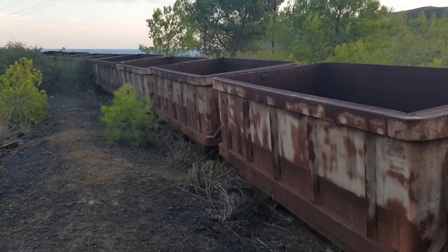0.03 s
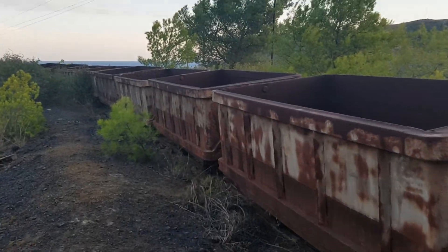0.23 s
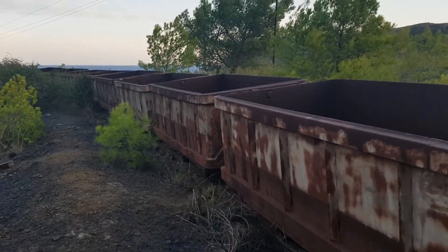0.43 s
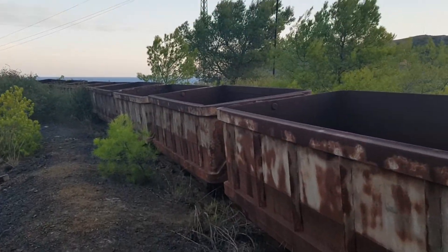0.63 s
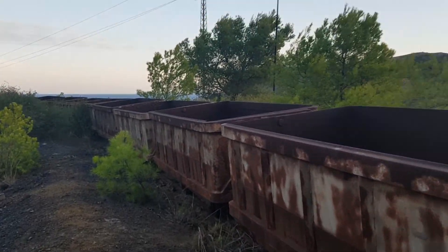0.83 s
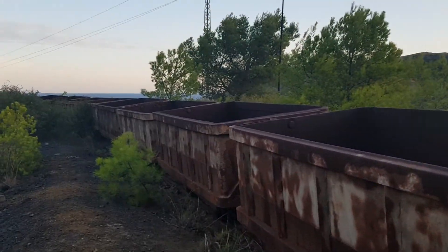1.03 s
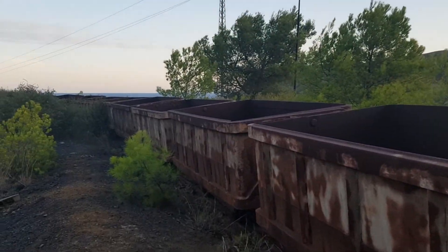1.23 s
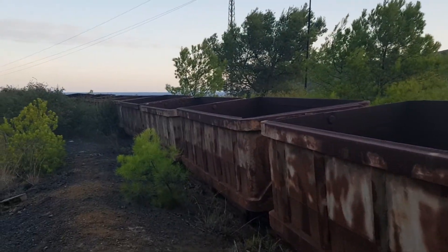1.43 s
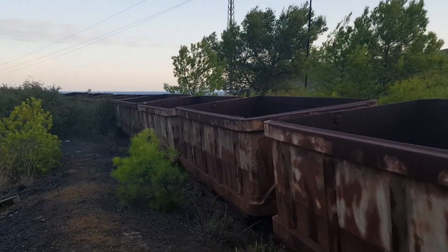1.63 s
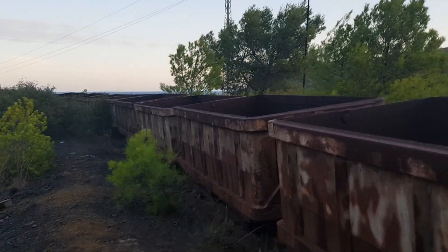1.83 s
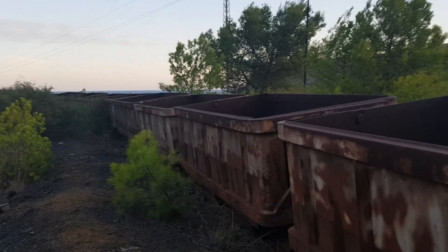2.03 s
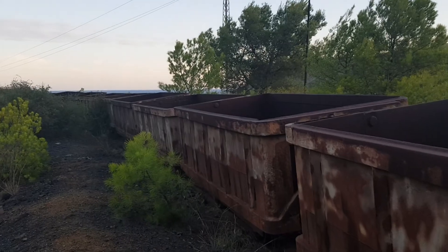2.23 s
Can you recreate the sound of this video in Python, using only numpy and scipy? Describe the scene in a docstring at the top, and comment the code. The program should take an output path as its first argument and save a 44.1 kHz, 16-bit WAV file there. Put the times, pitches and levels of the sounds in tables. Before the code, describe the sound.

Gravel footsteps: one loud grinding, cracking step, then lighter crunches amid rumbling wind gusts

```python
"""Footsteps on coarse gravel outdoors, heard through two microphone ports: noise, ringing sines and swells.
Wind, open-air hiss and a faint hum open; a step then grinds, cracks and pings (grains, rings, metal sine).
The strongest gusts buffet each port (low noise, short swings) around a second scuff near 0.8 s.
Lighter steps follow with soft thumps, a second hum near 1.15 s and one stone squeak near 1.57 s;
filtered-noise wind and hiss run to the end."""
import sys
import numpy as np
from scipy import signal
from scipy.fft import rfft, irfft
from scipy.io import wavfile
from scipy.ndimage import uniform_filter1d

SR = 44100
rng = np.random.default_rng(int(sys.argv[2]) if len(sys.argv) > 2 else 0)


def unload_audio(sound):
    """Save the sound as a 16-bit wav file, at the path given as the first command line argument."""
    columns = np.transpose(np.atleast_2d(sound))
    # keep every value between -1 and 1, then stretch to whole-number steps
    steps = np.round(np.clip(columns, -1, 1) * 32767)
    wavfile.write(sys.argv[1], SR, steps.astype(np.int16))


N = 101429  # length in samples


def amp(db):
    """Turns decibels into a linear gain."""
    return 10 ** (np.asarray(db, float) / 20)


def even(x):
    """Scales each channel to an RMS of 1."""
    return x / np.sqrt(np.mean(x ** 2, axis=-1, keepdims=True) + 1e-20)


def shape(x, points, sign=1):
    """Filters by a (freq_hz, gain_db) curve, straight in log frequency; sign scales its dB."""
    hz = np.fft.rfftfreq(x.shape[-1], 1 / SR)
    curve_hz, curve_db = np.transpose(points)
    gain_db = np.interp(np.log(hz + 1), np.log(curve_hz + 1), curve_db)
    return irfft(rfft(x) * amp(sign * gain_db), x.shape[-1])


def column(table, index):
    """Draws one table column as a line over time, with time in the first column."""
    return np.interp(np.arange(N) / SR, [row[0] for row in table], [row[index] for row in table])


def add(mix, start_s, sound, pan_db):
    """Mixes a sound in at a time, with a left-right level difference."""
    part = mix[:, max(round(start_s * SR), 0):][:, :sound.shape[-1]]
    part += amp([[pan_db / 2], [-pan_db / 2]]) * sound[..., :part.shape[1]]


# sole grinding and scuffing: start_s, length_s, body_db, grit_db, fizz_db
SCRAPE_STROKES = [(0.183, 0.088, -50, -67, -64), (0.211, 0.13, -43, -88, -63),
                  (0.278, 0.09, -50.5, -54, -55), (0.365, 0.072, -55, -66.5, -66),
                  (0.425, 0.096, -56.5, -64.5, -61), (0.555, 0.42, -64, -70, -73.5),
                  (0.735, 0.056, -54, -41, -43), (0.754, 0.052, -45.5, -43.5, -74),
                  (0.815, 0.026, -62, -56.5, -78), (1.022, 0.048, -110, -71, -69),
                  (1.194, 0.14, -70, -64, -63.5), (1.306, 0.024, -43, -48.5, -87),
                  (1.364, 0.027, -46, -59.5, -59.5), (1.413, 0.036, -50, -59, -86),
                  (1.57, 0.079, -61, -62.5, -98), (1.698, 0.06, -61, -62, -90),
                  (1.787, 0.031, -49, -63, -77), (1.833, 0.081, -54, -62, -80),
                  (1.922, 0.045, -50, -66, -96), (2.174, 0.039, -82, -84, -67)]
# stone noise colours, low to high: freq_hz, gain_db
BODY_COLOUR = [(200, -12), (500, -3), (1200, 0), (2200, -3), (3200, -7), (4500, -18), (16000, -50)]
GRIT_COLOUR = [(500, -87), (2000, -11), (3500, -4.5), (5500, -2), (7200, -16), (9000, -32), (16000, -36)]
FIZZ_COLOUR = [(200, -56), (6000, -12), (8200, -8), (10000, 0.5), (14300, 0), (15000, 1), (16000, -23)]
GRAINS_PER_S, SPREAD_DB, GRAIN_PAN_DB = 6000, 3.6, 3.0
SMOOTH_SHARE = .3  # share of plain hiss against grains
ATTACK_S, RELEASE_S = .006, .014
CLUMP_DB, SAG_DB = 2.0, -2  # RMS of the clumping; level change over one stroke length
RING_S, RISE_S = .00025, .0003  # extra ring time of every grain; onset of grains and cracks


def grind():
    """Random grains, each ringing one of 24 stones at its own place, clump into body, grit and fizz strokes."""
    t, ring_t = np.arange(N) / SR, np.arange(200) / SR
    hits = rng.random(N) < GRAINS_PER_S / SR
    size = hits * amp(SPREAD_DB * np.minimum(rng.exponential(1, N), 4))
    stone, grains = rng.integers(0, 24, N), np.zeros((2, N))
    for k, hz in enumerate(np.geomspace(400, 16000, 24)):
        decay = np.exp(-ring_t / (1.5 / hz + RING_S))
        ring = np.sin(2 * np.pi * hz * ring_t) * decay * np.minimum(ring_t / RISE_S, 1) * np.sqrt(hz)
        one_stone = signal.oaconvolve(size * (stone == k), ring)[:N]
        add(grains, 0, one_stone, GRAIN_PAN_DB * rng.standard_normal())

    slow_noise = uniform_filter1d(uniform_filter1d(rng.standard_normal(N), size=200), size=200)
    clumps = amp(CLUMP_DB * even(slow_noise))
    level, hiss = np.zeros((3, N)), rng.standard_normal((3, N))
    for start_s, length_s, *band_db in SCRAPE_STROKES:
        part = slice(round(start_s * SR), round((start_s + length_s + 8 * RELEASE_S) * SR))
        age = t[part] - start_s
        release = np.exp(-np.maximum(age - length_s, 0) / RELEASE_S)
        stroke = np.clip(age / ATTACK_S, 0, 1) * amp(SAG_DB * age / length_s) * release
        level[:, part] += amp(band_db)[:, None] * stroke

    out = np.zeros((2, N))
    for k, colour in enumerate([BODY_COLOUR, GRIT_COLOUR, FIZZ_COLOUR]):
        rough = even(shape(grains, colour))
        smooth = even(shape(hiss[0] + hiss[1:], colour))  # partly shared by the ports
        out += level[k] * ((1 - SMOOTH_SHARE) * rough + SMOOTH_SHARE * smooth)
    return clumps * out


# single stones cracking: start_s, level_db, low_ring_hz, upper_ring_hz, upper_ring_db (relative to level_db)
STONE_CRACKS = [(0.17, -41.5, 1190, 2630, -21), (0.224, -39, 1900, 4500, -21),
                (0.2362, -17.5, 1640, 3230, -26), (0.238, -26, 1750, 990, -10),
                (0.2458, -10.5, 1260, 4220, -9), (0.259, -22.5, 530, 4200, -0.5),
                (0.2622, -14.5, 1110, 2200, -10), (0.292, -30, 633, 1900, -7),
                (0.3261, -14, 1240, 2520, -6), (0.336, -25.5, 1080, 2090, 4.5),
                (0.387, -25.5, 740, 1530, -4), (0.438, -32, 794, 2440, -3), (0.504, -37.5, 560, 1530, -4),
                (0.737, -39.5, 538, 4750, 13), (0.755, -33, 575, 4020, 5), (0.784, -17, 2370, 5400, -7),
                (0.7955, -26.5, 3400, 3600, 4.5), (0.7976, -25.5, 2030, 5030, 9),
                (0.804, -36, 2000, 5900, 18), (0.850, -49, 538, 4360, 4), (0.905, -35, 550, 4770, -2),
                (1.0039, -36, 584, 3880, 0), (1.052, -62, 711, 5490, 12), (1.087, -46, 455, 5540, 5.5),
                (1.158, -43, 545, 5430, 7), (1.276, -34, 479, 5500, 2.5), (1.303, -40, 660, 2920, -12),
                (1.3205, -35.5, 700, 3180, 9), (1.3593, -34, 660, 4650, 2.5),
                (1.379, -32.5, 400, 5570, 0.5), (1.425, -30, 1420, 4690, -2.5), (1.444, -45, 624, 5100, 6),
                (1.609, -31, 2070, 3020, -9.5), (1.704, -56.5, 483, 4830, 19), (1.786, -39, 751, 2600, 3),
                (1.796, -28, 650, 2900, -18), (1.869, -38, 1240, 3300, 8), (1.891, -34.5, 1370, 2700, -7),
                (1.897, -33, 1240, 3460, -12), (1.928, -29.5, 1740, 3380, -14), (1.945, -43, 900, 2480, 2),
                (1.956, -40, 895, 2200, -2), (2.156, -42.5, 510, 5070, -18), (2.208, -38, 676, 2530, -25)]
RING_CYCLES, UPPER_CYCLES = 1.0, 3.2  # cycles until a ring falls to 1/e
TICK_DB, SNAP_DB, RATTLE_DB = -8.5, -22.5, -18.5  # tick and snap also follow upper_ring_db
TICK_T60, SNAP_T60, RATTLE_T60 = 0.0049, 0.02, 0.044  # seconds to fall 60 dB


def cracks():
    """Each crack: a low and an upper ring of the stone, a tick, a treble snap and a rattle of neighbours."""
    out, t = np.zeros((2, N)), np.arange(1536) / SR
    noise = rng.standard_normal((len(STONE_CRACKS), 3, 2, len(t)))
    for row, (tick_noise, snap_noise, rattle_noise) in zip(STONE_CRACKS, noise):
        start_s, level_db, low_hz, upper_hz, upper_db = row
        low_ring = np.sin(2 * np.pi * low_hz * t) * np.exp(-t * low_hz / RING_CYCLES)
        upper_ring = amp(upper_db) * np.sin(2 * np.pi * upper_hz * t) * np.exp(-t * upper_hz / UPPER_CYCLES)
        tick_colour = even(shape(tick_noise[0] + .5 * tick_noise, GRIT_COLOUR))
        tick = amp(upper_db + TICK_DB - 60 * t / TICK_T60) * tick_colour
        snap = amp(upper_db + SNAP_DB - 60 * t / SNAP_T60) * even(shape(snap_noise, FIZZ_COLOUR))
        neighbours = shape(rattle_noise, BODY_COLOUR) + amp(upper_db) * shape(rattle_noise, GRIT_COLOUR)
        rattle = amp(RATTLE_DB - 60 * t / RATTLE_T60) * even(neighbours)
        crack = low_ring + upper_ring + tick + snap + rattle
        add(out, start_s, amp(level_db) * np.minimum(t / RISE_S, 1) * crack, 0)
    return out


# sole landing: start_s, level_db, pitch_hz
SOLE_THUDS = [(0.258, -29, 312), (0.91, -28, 370), (1.312, -32, 362), (1.79, -40, 565)]
THUD_RISE_S, THUD_T60 = 0.0016, 0.048  # onset; seconds to fall 60 dB


def thuds():
    """A short hollow thump of the packed ground: a quickly decaying sine."""
    out, t = np.zeros((2, N)), np.arange(3000) / SR
    for start_s, level_db, hz in SOLE_THUDS:
        envelope = amp(level_db - 60 * t / THUD_T60) * np.minimum(t / THUD_RISE_S, 1)
        add(out, start_s, envelope * np.sin(2 * np.pi * hz * t), 0)
    return out


CHIRP_S, CHIRP_LENGTH_S, CHIRP_HZ, CHIRP_DB = 1.568, 0.016, 5150, -47.5
CHIRP_OCTAVE_DB, CHIRP_SLIPS_HZ = -3, 200  # octave relative to the tone; slips (swells) per second


def chirp():
    """A small stone squeaks in quick slips: a wavering tone and its octave, pulsed."""
    out, t = np.zeros((2, N)), np.arange(0, CHIRP_LENGTH_S, 1 / SR)
    waver = np.cumsum(0.087 * rng.standard_normal(len(t)))  # random walk of phase, radians
    phase = 2 * np.pi * CHIRP_HZ * t + waver
    tone = np.sin(phase) + amp(CHIRP_OCTAVE_DB) * np.sin(2 * phase)
    slips = np.sin(np.pi * CHIRP_SLIPS_HZ * t) ** 2
    add(out, CHIRP_S, amp(CHIRP_DB) * slips * tone, 0)
    return out


# port colour: freq_hz, left_minus_right_db
PORT_COLOUR = [(180, -1.5), (550, 7), (1650, -2.5), (4970, -2.5), (15000, 2.5)]
LEFT_LAG_S = .00004
SCATTER_T60, SCATTER_LEVEL_DB = .008, -12  # seconds to fall 60 dB; total relative to the direct sound


def ground(x):
    """Port colour and delay, plus scattering off the stones as decaying noise that differs per port."""
    t = np.arange(800) / SR
    taps = rng.standard_normal((2, len(t))) * amp(-60 * t / SCATTER_T60)
    taps *= amp(SCATTER_LEVEL_DB) / np.linalg.norm(taps, axis=1, keepdims=True)
    # direct sound at tap 6, the left a fraction later; the 6 samples are cut off again below
    taps[0, :16] += np.sinc(np.arange(16) - 6 - LEFT_LAG_S * SR)
    taps[1, 6] += 1
    left, right = signal.oaconvolve(x, taps, axes=1)[:, 6:N + 6]
    return np.array([shape(left, PORT_COLOUR, sign=.5), shape(right, PORT_COLOUR, sign=-.5)])


# small metal part: start_s, level_db
METAL_PINGS = [(0.238, -45), (0.311, -49.5), (0.3627, -51.5)]
PING_HZ, PING_T60 = 10400, .035  # pitch; seconds to fall 60 dB


def pings():
    """A small metal part rings as a decaying high sine."""
    out, t = np.zeros((2, N)), np.arange(3000) / SR
    for start_s, level_db in METAL_PINGS:
        add(out, start_s, amp(level_db - 60 * t / PING_T60) * np.sin(2 * np.pi * PING_HZ * t), 0)
    return out


# faint short hums: start_s, length_s, pitch_hz, level_db
FAINT_HUMS = [(0.035, 0.093, 401, -57), (1.142, 0.19, 296.7, -56.5)]


def hums():
    """Each hum is a steady sine that swells and fades."""
    out = np.zeros((2, N))
    for start_s, length_s, hz, level_db in FAINT_HUMS:
        t = np.arange(0, length_s, 1 / SR)
        swell = np.sin(np.pi * t / length_s) ** .5
        add(out, start_s, amp(level_db) * swell * np.sin(2 * np.pi * hz * t), 0)
    return out


# wind strength on the ports: time_s, left_db, right_db
WIND_LEVELS = [(0.0, -53, -48), (0.1, -39.5, -54), (0.33, -35, -32.5), (0.39, -36, -47.5), (0.42, -42, -46),
               (0.48, -35.5, -43), (0.51, -49, -52), (0.54, -37.5, -35), (0.59, -29, -42),
               (0.65, -23.5, -32), (0.7, -18.5, -18), (0.79, -49, -23.5), (0.83, -29.5, -29.5),
               (0.89, -40.5, -28.5), (0.94, -19.5, -24), (0.98, -75, -57.5), (1.08, -72, -50),
               (1.2, -39, -49), (1.42, -74, -57), (1.51, -45, -39), (1.58, -48.5, -93), (1.62, -42, -47),
               (1.71, -51, -51), (1.78, -46, -43), (1.83, -30.5, -33.5), (1.88, -57, -37),
               (2.01, -29.5, -33.5), (2.04, -36.5, -45.5), (2.07, -34, -28), (2.1, -35, -42),
               (2.13, -36.5, -34), (2.22, -36, -35), (2.29, -36.5, -42)]
# turbulence colour: freq_hz, gain_db
GUST_COLOUR = [(12, -72), (30, -15), (55, 4), (100, -0.5), (150, -8), (210, -13.5), (315, -18.5),
               (430, -33), (770, -46), (1100, -88)]
# sharp pressure buffets: centre_s, level_db, swing_hz, left_minus_right_db
PRESSURE_BUFFETS = [(0.108, -30.5, 115, 17), (0.546, -24, 112.7, -8), (0.604, -23, 104, 17.5),
                    (0.648, -24.5, 97, 22), (0.664, -18, 127.6, -16.5), (0.709, -18.5, 120, 17),
                    (0.717, -19.5, 152, -13), (0.744, -25.5, 160, 26), (0.786, -18.5, 112, 5),
                    (0.802, -23.5, 138, 18), (0.933, -32.5, 88, -4), (1.2, -30.5, 89, -1),
                    (1.817, -41, 111, 1), (2.006, -27.5, 110.5, 1), (2.219, -33, 113, 5)]
BUFFET_CYCLES = 0.84  # width of the bell envelope, in swings
LUMP_DB, LUMP_HZ = 3.5, 24.4  # RMS of the level lumps; rate above which they fall away
WIND_SAME = -0.28  # left turbulence mixed into the right, inverted
BRIGHTEN, CALM_DB = 0.098, -32.5  # upper-part dB per dB of wind above CALM_DB


def wind():
    """Lumpy low turbulence, nearly unrelated per port and brighter when strong, with single pressure buffets."""
    turbulence, lumps = rng.standard_normal((2, 2, N))
    turbulence[1] += WIND_SAME * turbulence[0]
    lumps = even(shape(lumps, [(1, 0), (LUMP_HZ, 0), (3 * LUMP_HZ, -40), (20000, -90)]))
    level_db = np.array([column(WIND_LEVELS, index=1), column(WIND_LEVELS, index=2)])
    flow = even(shape(turbulence, GUST_COLOUR + [(2000, -97.0)]))
    low = shape(flow, [(140, 10), (220, -46), (400, -89.5)])
    brightness = amp(BRIGHTEN * (level_db - CALM_DB))
    out = amp(level_db + LUMP_DB * lumps) * (low + brightness * (flow - low))
    for centre_s, buffet_db, hz, pan_db in PRESSURE_BUFFETS:
        cycles = np.arange(-2, 2, hz / SR)
        bell = np.exp(-(cycles / BUFFET_CYCLES) ** 2 * 2)
        add(out, centre_s - 2 / hz, amp(buffet_db) * bell * np.sin(2 * np.pi * cycles), pan_db)
    return out


# open-air hiss colour: freq_hz, gain_db
AIR_COLOUR = [(150, -13), (250, -5.5), (407, -3), (1100, -19.5), (1980, -18), (3460, -22.5), (4900, -20.5),
              (6590, -26), (8260, -38.5), (11700, -23.5), (16000, -30.5)]
AIR_DB, AIR_SAME = -62, 0.46  # RMS level; weight of the noise common to both ports


def air():
    """Quiet open-air hiss: steady coloured noise, partly common to both ports."""
    noise = rng.standard_normal((3, N))
    ports = AIR_SAME * noise[0] + np.sqrt(1 - AIR_SAME ** 2) * noise[1:]
    return amp(AIR_DB) * even(shape(ports, [(60, -36)] + AIR_COLOUR))


def scene():
    """Stone and sole sounds pass the ground and ports; metal, hums, wind and hiss are added directly."""
    steps = grind() + cracks() + thuds() + chirp()
    return ground(steps) + pings() + hums() + wind() + air()


EDGE_HZ = 15800  # top of the band


def record(dry):
    """Limits the band with a steep low-pass."""
    low_pass = signal.firwin(511, EDGE_HZ, window=("kaiser", 9), fs=SR)
    return signal.oaconvolve(dry, low_pass[None], "same")


dry = scene()
out = record(dry)
unload_audio(out)
```